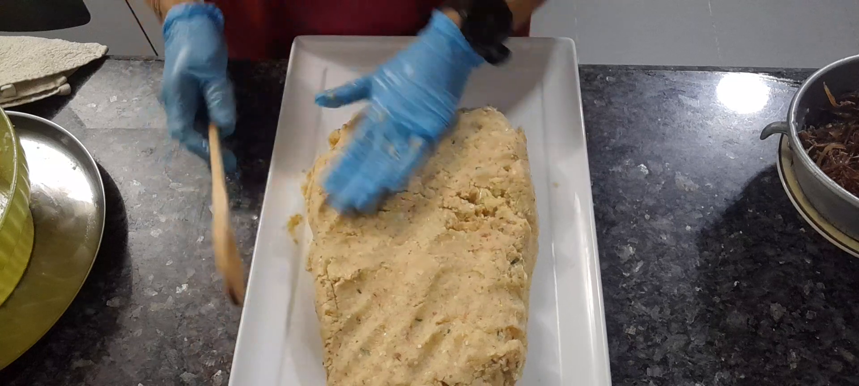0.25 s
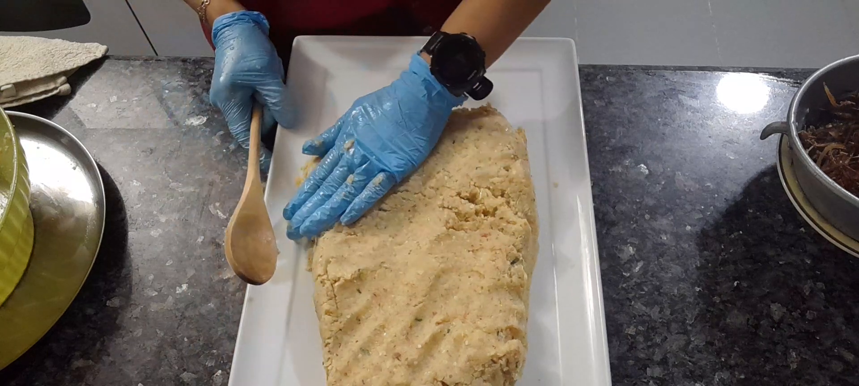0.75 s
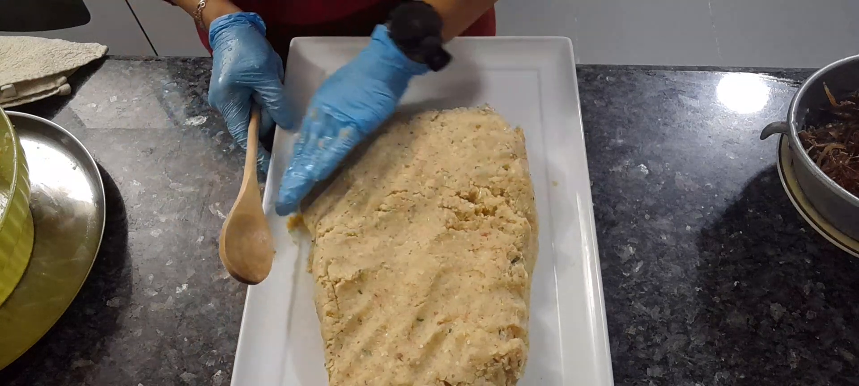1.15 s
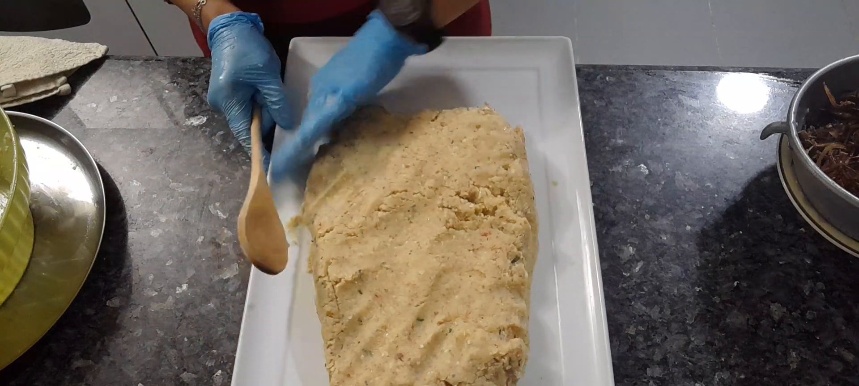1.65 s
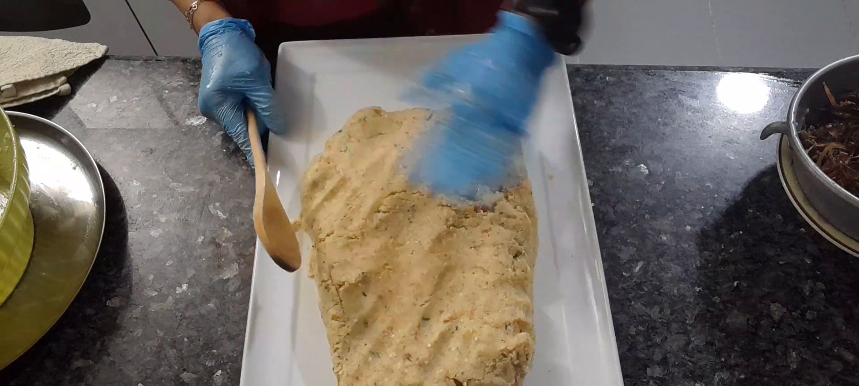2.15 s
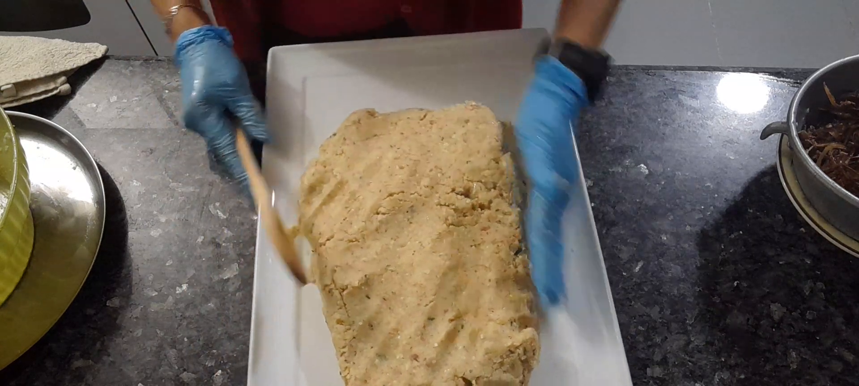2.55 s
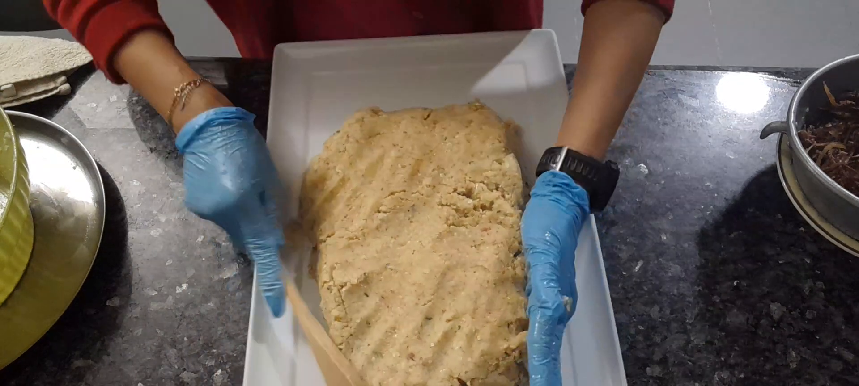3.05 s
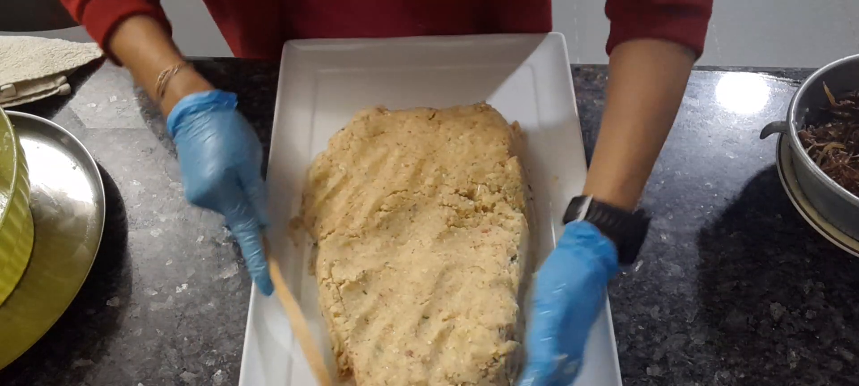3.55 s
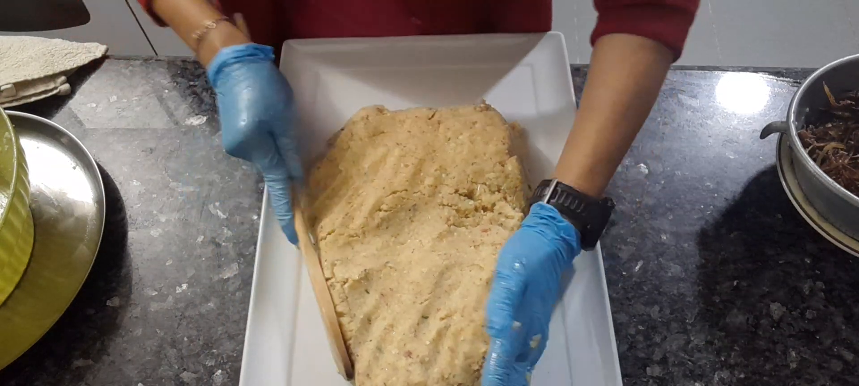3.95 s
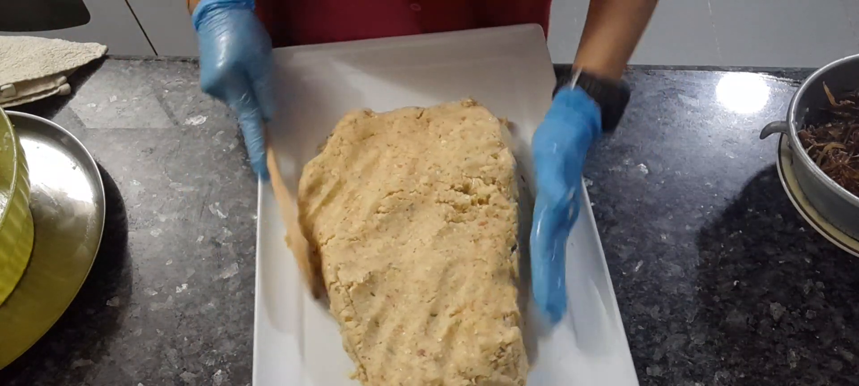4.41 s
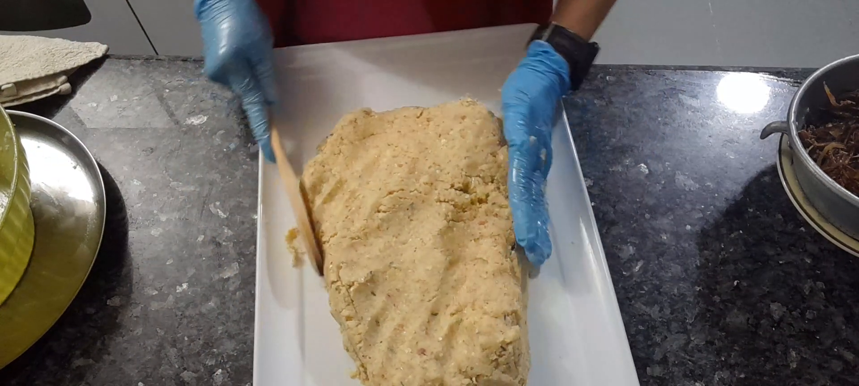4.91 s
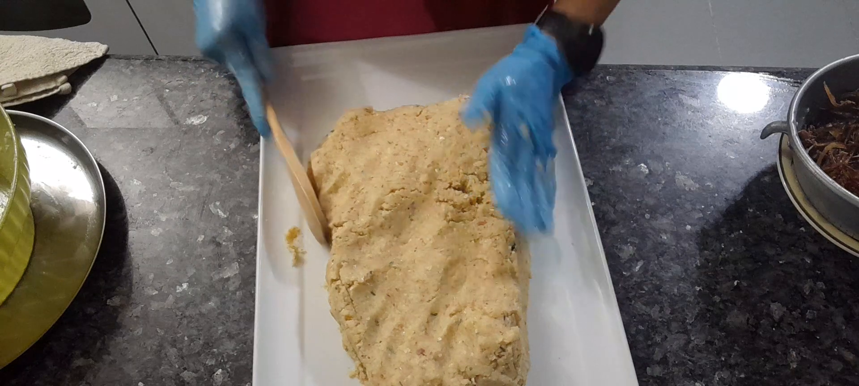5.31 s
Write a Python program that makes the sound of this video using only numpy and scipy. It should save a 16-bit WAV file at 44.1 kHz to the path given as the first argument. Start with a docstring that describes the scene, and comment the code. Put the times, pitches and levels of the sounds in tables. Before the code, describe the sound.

In a small, quiet kitchen, a quick cluster of dull platter knocks and wooden spatula taps opens the scene. Then mostly soft glove swishes and faint sticky crackles, until pushes rock the dish again in irregular bursts from the middle to the end. A tiny squeak and faint metallic bracelet ticks come late. Close stereo microphone, short room echo, low steady background hum.

```python
'''A quick run of dull knocks opens the scene: hands and a spatula press mash into shape on a platter.
Each push rocks the ceramic platter against the counter; under a flat palm it chatters briefly.
The wooden spatula taps the dish. Thin gloves swish, crackle, click and squeak, and a bracelet ticks faintly.
Blows are decaying sine waves and short noise bursts; the gloves are mostly shaped noise.
A small kitchen adds its bass, its echo and a quiet background.'''
import sys
import numpy as np
from scipy import signal
from scipy.fft import rfft, irfft, next_fast_len
from scipy.io import wavfile

SR = 44100
rng = np.random.default_rng(int(sys.argv[2]) if len(sys.argv) > 2 else 0)


def bounce(signal):
    """Save signal as a 16-bit WAV file at the path given by the first command-line argument."""
    frames = np.transpose(np.atleast_2d(signal))
    limited = np.clip(frames, -1, 1)
    pcm = np.round(limited * 32767).astype(np.int16)
    wavfile.write(sys.argv[1], SR, pcm)


N = 245621
AGE = np.arange(int(SR * .7)) / SR  # time since a blow, in seconds
OPPOSITE = np.array([[1], [-1]])  # left and right move in opposite directions


def from_db(db):
    """Turn decibels into a gain."""
    return 10 ** (np.asarray(db) / 20)


def at_hz(points, hz):
    """Read a table between its points on a log-frequency axis."""
    points_hz, values = np.array(points).T
    return np.interp(np.log(hz + 1), np.log(points_hz), values)


def fade(t60):
    """Exponential decay: the sound falls by 60 dB in t60 seconds."""
    return from_db(-60 * AGE / max(t60, 1e-3))


def onset(rise_s):
    """A contact takes a moment to build up."""
    return 1 - np.exp(-(AGE / rise_s) ** 2)


def add(out, s, sound):
    """Mix a sound in at time s, in seconds."""
    i = max(round(s * SR), 0)
    out[:, i:i + sound.shape[-1]] += sound[..., :max(N - i, 0)]


def noise(spectrum, side_db, size):
    """Coloured stereo noise of rms 1; side_db sets how much the two ears differ."""
    length = next_fast_len(size)
    colour = from_db(at_hz(spectrum, np.fft.rfftfreq(length, 1 / SR)))
    white = rng.standard_normal((2, length))
    mid, side = irfft(rfft(white) * colour, length)[:, :size]
    both = mid + from_db(side_db) * side * OPPOSITE
    return both / both.std()


# each blow lands elsewhere and wakes the modes unevenly (dB)
SCATTER_DB = 2


def ring(modes, soft_hz, spread):
    """One blow on a set of modes: a soft contact spares the high ones, whose phase differs between the ears."""
    out = 0
    for k, (hz, db, t60) in enumerate(modes):
        softness = np.hypot(1, (hz / soft_hz) ** 3)
        gain = from_db(db + SCATTER_DB * rng.standard_normal()) / softness
        # short waves reach the two ears out of step
        skew = spread * hz / (hz + 500) * rng.choice([-1, 1]) * rng.uniform(0.21, 1) * OPPOSITE
        wave = np.sin((2 * np.pi * hz * AGE + skew).astype(np.float32))
        out = out + (-1) ** k * gain * fade(t60) * wave
    return out * onset(1 / soft_hz)


def slipping(per_s):
    """Random grip and slip at a given rate."""
    return np.interp(np.arange(N) * per_s / SR, np.arange(N), rng.standard_normal(N))


# Tone of the still kitchen. Each row: frequency in Hz, relative strength in dB per Hz.
QUIET_SPECTRUM = [(15, -67), (25, -32), (102, -12.5), (114, -9), (134, 1.5), (153, -12), (326, -16.5),
                  (384, -26.5), (451, -22.5), (775, -38.5), (3520, -52.5), (4140, -46), (4740, -52.5),
                  (7510, -44.5), (16000, -67.5)]


def quiet_kitchen(level_db):
    """The still kitchen is a steady, mostly low noise."""
    return from_db(level_db) * noise(QUIET_SPECTRUM, side_db=-11, size=N)


# How long the kitchen echoes. Each row: frequency in Hz, time to fall by 60 dB in seconds.
ECHO_DECAY = [(150, 0.4), (500, 0.32), (1500, 0.43), (3000, 0.42), (6000, 0.37), (14000, .2)]
# Colour of the echo. Each row: frequency in Hz, relative level in dB.
ECHO_COLOUR = [(60, 9), (180, -6.5), (400, 0), (1000, -8), (3000, -10.5), (6000, -10.5), (14000, -8)]


def kitchen_echo(x, build_s):
    """A diffuse tail, dying band by band, alike in both ears in the bass."""
    white = rng.standard_normal((2, 2, len(AGE)))
    tail = 0
    edges = np.geomspace(60, 16000, 13)
    for k, (low, high) in enumerate(zip(edges, edges[1:])):
        hz = np.sqrt(low * high)
        band = signal.butter(2, [low, high], "band", fs=SR, output="sos")
        mid, side = signal.sosfilt(band, white[k % 2])
        both = mid + side * hz / np.hypot(hz, 600) * OPPOSITE
        tail = tail + both * from_db(at_hz(ECHO_COLOUR, hz)) * fade(at_hz(ECHO_DECAY, hz))
    tail = tail * onset(build_s)
    return signal.fftconvolve(x, tail / np.sqrt(SR * 0.013), axes=1)[:, :N]


# Low resonances of counter and room.
# Each row: frequency in Hz, relative level in dB, time to fall by 60 dB in seconds.
BOOM_MODES = [(54, -17, 0.55), (81.25, -5, 0.75), (106.04, -0.5, 0.6), (139.1, 5.5, 0.36), (160, -9, 0.036),
              (169, 5, 0.4), (202.8, 11.5, 0.39), (221.6, -4, 0.27), (270, -4, 0.15), (310.5, -13, 0.83),
              (304, -2.5, 0.099)]
# A palm comes down on the mash; contacts() below plays these too.
# Each row: start in seconds, relative weight in dB, length of the press in seconds.
PALM_PRESSES = [(0.074, -20, 0.092), (0.439, -53.5, 0.021), (0.622, -29, 0.033), (1.035, -59, 0.029),
                (1.927, -26, .046), (4.839, -39, 0.018), (5.332, -48, .07), (5.524, -19.5, 0.029)]


def boom(hits, knock_db, pat_db, delay_s):
    """Standing waves keep the bass going; a slow palm wakes mainly the deepest of them."""
    out = np.zeros((2, N))
    for s, db, _, _, _ in hits:
        swing = ring(BOOM_MODES, soft_hz=500, spread=0.75) * onset(0.00083)
        add(out, s + delay_s, from_db(db + knock_db) * swing)
    for s, db, _ in PALM_PRESSES:
        add(out, s, from_db(db + pat_db) * ring(BOOM_MODES, soft_hz=112, spread=1.0))
    return out


# Touches of the bracelet links. Each row: start in seconds, relative level in dB.
BRACELET_TICKS = [(2.8526, -51), (3.1277, -52.5), (3.234, -57), (3.7536, -50), (4.0206, -52),
                  (4.365, -48.5), (4.58, -57.5), (4.853, -58.5)]
# Notes of the bracelet.
# Each row: frequency in Hz, relative level in dB, time to fall by 60 dB in seconds.
BRACELET_MODES = [(7200, -6, 0.013), (7350, 3.5, 0.047), (13100, 6.5, 0.077), (13260, -7.5, .06),
                  (13270, -17, 0.069)]


def bracelet(tick_db):
    """Small metal links touch as the wrist turns: short, very high notes."""
    out = np.zeros((2, N))
    for s, db in BRACELET_TICKS:
        add(out, s, from_db(db + tick_db) * ring(BRACELET_MODES, soft_hz=18000, spread=2.4))
    return out


# Rubber squeaking on the glaze. Each row: start in seconds, relative level in dB.
SQUEAK_EVENTS = [(2.836, -58.5), (3.715, -54.5), (4.359, -39)]
# Pitch of a squeak, a narrow band. Each row: frequency in Hz, relative strength in dB per Hz.
SQUEAK_SPECTRUM = [(5600, -43), (6500, -7), (6750, 2), (7000, -23), (8000, -44)]


def squeaks(squeak_db, rise_s, t60):
    """Wet rubber sticks and slips fast enough to chirp."""
    out = np.zeros((2, N))
    for s, db in SQUEAK_EVENTS:
        chirp = noise(SQUEAK_SPECTRUM, side_db=0, size=len(AGE)) * onset(rise_s) * fade(t60)
        add(out, s, from_db(db + squeak_db) * chirp)
    return out


# How strongly damp mash and rubber crackle under the hands; gloves() below plays this too.
# Each row: time in seconds, relative level in dB.
CRACKLE_LEVEL = [(0.0, -78), (0.14, -79), (0.32, -86), (0.57, -85.5), (0.77, -78), (1.1, -91),
                 (1.41, -83.5), (1.61, -86.5), (1.88, -79.5), (2.3, -87.5), (2.54, -78), (2.69, -79.5),
                 (2.94, -77.5), (4.33, -74), (4.48, -73.5), (4.92, -79.5), (5.18, -83.5), (5.55, -75.5)]
# Tone of the gloves, also in gloves(). Each row: frequency in Hz, relative strength in dB per Hz.
GLOVE_SPECTRUM = [(300, -18.5), (900, -10.5), (1600, -12.5), (3000, -2), (4500, -3.5), (7600, 2.5),
                  (9000, -10), (13000, -4), (16000, -8.5)]
# average rate (per s), least level against the crackle table (dB), spread of sizes (dB)
STICKY_PER_S, STICKY_DB, STICKY_SPREAD_DB = 8.8, 21, 2


def sticky_clicks():
    """Specks of damp mash let go of the rubber one by one, louder the more the hands work."""
    work_db = np.interp(np.arange(N) / SR, *np.transpose(CRACKLE_LEVEL))
    born = rng.random(N) < STICKY_PER_S / SR
    extra_db = STICKY_SPREAD_DB * np.minimum(rng.exponential(1, N), 3)
    sizes = from_db(work_db + STICKY_DB + extra_db)
    click = noise(GLOVE_SPECTRUM, side_db=-0.5, size=len(AGE)) * fade(0.006)
    click = click / np.sqrt(np.sum(click ** 2))
    return signal.fftconvolve((born * sizes)[None], click, axes=1)[:, :N]


# Glove strokes over the mash. Each row: fastest moment in seconds, relative level in dB,
# basic half length in seconds, tilt in dB per octave.
GLOVE_STROKES = [(0.261, -55, 0.034, -5), (0.628, -71, 0.065, -3), (.932, -58.5, 0.025, -3),
                 (1.656, -65.5, 0.022, 0), (1.991, -60.5, 0.049, -7), (2.539, -56.5, 0.037, -7.5),
                 (2.847, -57.5, .014, -0.5), (3.09, -60.5, .018, -8.5), (3.446, -56, 0.031, -1.5),
                 (3.814, -60.5, 0.033, -3.5), (4.078, -56.5, 0.022, 0), (4.369, -56, 0.024, -3),
                 (4.635, -60, 0.043, -4), (5.075, -69, 0.023, 0), (5.319, -54.5, 0.024, -2.5)]
# A glove snaps free. Each row: start in seconds, relative level in dB.
GLOVE_SNAPS = [(0.052, -48), (1.431, -57), (1.6213, -54.5), (1.8764, -49), (2.901, -50), (3.118, -52),
               (3.1922, -53.5), (3.3697, -52.5), (4.0177, -42)]
# the hand gathers speed more slowly than it stops: rise and fall as shares of the half length
STROKE_RISE, STROKE_FALL = 1.1, 0.73


def gloves(stroke_db, rub_db, grain_db, crackle_db, snap_db):
    """Thin rubber slides in tiny slips, crackles on the damp mash and now and then snaps free."""
    clock = np.arange(N) / SR
    slips, clumps = slipping(430), slipping(100)
    work_db = np.interp(clock, *np.transpose(CRACKLE_LEVEL))
    crackle = work_db + rub_db + crackle_db * (slips + clumps)
    # the crackle is brighter than the plain glove tone
    bright = [(hz, db + 1.9 * np.log2(hz)) for hz, db in GLOVE_SPECTRUM]
    out = from_db(crackle) * noise(bright, side_db=1, size=N)

    for s, db, length, tilt in GLOVE_STROKES:
        # friction follows the speed of the hand
        near = np.abs(clock - s) < .25
        lag = clock[near] - s
        share = np.where(lag < 0, STROKE_RISE, STROKE_FALL)
        speed = np.exp(-.5 * (lag / length / share) ** 2)
        # a flat palm sounds duller than the fingertips
        colour = [(hz, level + tilt * np.log2(hz)) for hz, level in GLOVE_SPECTRUM]
        gain = from_db(db + stroke_db + grain_db * slips[near])
        out[:, near] += gain * speed * noise(colour, side_db=0, size=len(lag))

    snap_shape = onset(0.00046) * (fade(0.01) + 0.25 * fade(0.06))
    for s, db in GLOVE_SNAPS:
        snap = noise(GLOVE_SPECTRUM, side_db=-2.0, size=len(AGE)) * snap_shape
        add(out, s, from_db(db + snap_db) * snap)
    return out


# Spatula on the platter. Each row: start in seconds, then relative levels in dB
# of the dish, the wood and the glaze ring.
SPATULA_TAPS = [(.076, -31, -26, -55.5), (.116, -35.5, -27, -64), (1.799, -62.5, -90, -98),
                (2.684, -27.5, -30, -38.5), (4.437, -50, -50.5, -80), (4.501, -30, -43, -62),
                (4.772, -26, -12.5, -47)]
# Notes of the platter, mostly short, the lowest ringing longest; clacks() below rings them too.
# Each row: frequency in Hz, relative level in dB, basic time to fall by 60 dB in seconds.
PLATTER_MODES = [(315.8, -2.5, 0.38), (349.6, -1.5, 0.19), (428, -4, 0.17), (474.2, 2, 0.064),
                 (575, 0, 0.087), (631.5, -2.5, 0.17), (702, -4, 0.11), (810, -7, 0.032),
                 (870, -3.5, 0.097), (977, -10.5, 0.037), (1925, -13, 0.14), (2780, -4, 0.26),
                 (2840, -7, 0.14), (3730, -10.5, 0.18), (5626, -15, 0.19), (6110, -13, 0.11),
                 (7620, -18, 0.15), (8600, -23, .12), (13520, -23.5, .15)]
# Notes of the wooden spatula.
# Each row: frequency in Hz, relative level in dB, time to fall by 60 dB in seconds.
SPATULA_MODES = [(1185, -4.5, 0.033), (1270, -10.5, 0.13), (1450, -12.5, 0.11), (1660, -4, 0.023),
                 (1744, 1, 0.02), (1932, 3.5, 0.02), (2050, -3.5, 0.016), (2047, -6, 0.027),
                 (2200, -7, 0.039), (2400, -1.5, 0.019), (2527, -5, 0.052), (2712, 1.5, 0.044),
                 (2940, -18, 0.017), (3535, -12, .06)]
# Tone of the platter's clack, also in clacks(), and of the spatula's rattle.
# Each row: frequency in Hz, relative strength in dB per Hz.
CLACK_SPECTRUM = [(200, -8), (350, 5), (900, 6), (1300, 1), (2000, -1), (2900, -4.5), (3600, -16.5),
                  (4500, -23), (7500, -35), (10000, -53.5), (16000, -48)]
# Tone of the spatula's crack. Each row: frequency in Hz, relative strength in dB per Hz.
CRACK_SPECTRUM = [(300, -15.5), (1200, -4), (3000, 1.5), (4000, -6.5), (5500, 0), (7800, -4), (9200, -17.5),
                  (13000, -18), (16000, -30)]
# the crack grows much faster than the blow: dB per dB of dish
CRACK_GROWTH = 4.8


def spatula(dish_db, wood_db, glaze_db, crack_db, rattle_db):
    """Wood on ceramic: a crack, a rattle, the short note of the spatula and the ring of the dish."""
    out = np.zeros((2, N))
    high_pass = signal.butter(2, 2000, "high", fs=SR, output="sos")
    lean_left = from_db([[2.5], [-2.5]])
    hardest = max(dish for _, dish, _, _ in SPATULA_TAPS)
    for s, dish, wood, glaze in SPATULA_TAPS:
        add(out, s, from_db(dish + dish_db) * ring(PLATTER_MODES, soft_hz=1420, spread=0.58))
        wood_note = ring(SPATULA_MODES, soft_hz=3900, spread=0.89) * lean_left
        add(out, s, from_db(wood + wood_db) * wood_note)
        rattle = noise(CLACK_SPECTRUM, side_db=-6.5, size=len(AGE)) * onset(.001) * fade(0.16)
        add(out, s, from_db(wood + rattle_db) * rattle)
        # the hard edge of the blow wakes the high modes
        glaze_ring = signal.sosfilt(high_pass, ring(PLATTER_MODES, soft_hz=15000, spread=1.2))
        add(out, s, from_db(glaze + glaze_db) * glaze_ring)
        crack = noise(CRACK_SPECTRUM, side_db=3.5, size=len(AGE)) * onset(.0006) * fade(0.039)
        add(out, s, from_db(crack_db + CRACK_GROWTH * (dish - hardest)) * crack)
    return out


# Tone of the jolted mash. Each row: frequency in Hz, relative strength in dB per Hz.
SQUASH_SPECTRUM = [(30, -42), (100, -9), (250, 0), (350, 7.5), (480, -10.5), (700, -7.5), (1000, -25.5),
                   (1500, -26), (3000, -49), (16000, -77.5)]


def clacks(hits, dish_db, squash_db, clack_db, edge_db, squash_t60, clack_t60, hard_db, dulling, knee_hz):
    """The foot of the platter meets the stone: a dull ring, the jolt of the mash and a short clack."""
    out = np.zeros((2, N))
    squash_shape = onset(0.00074) * fade(squash_t60)
    clack_shape = onset(0.0012) * (fade(clack_t60) + from_db(edge_db) * fade(0.0059))
    for s, _, _, dish, clack in hits:
        dull_ring = ring(PLATTER_MODES, soft_hz=1000, spread=0.63) * fade(0.96)
        add(out, s, from_db(dish + dish_db) * dull_ring)
        squash = noise(SQUASH_SPECTRUM, side_db=-10, size=len(AGE)) * squash_shape
        add(out, s, from_db(dish + squash_db) * squash)
        # a gentler contact loses its top: dB per octave above the knee
        slope = dulling * np.clip(hard_db - clack, 0, 20)
        colour = [(hz, db - slope * max(np.log2(hz / knee_hz), 0)) for hz, db in CLACK_SPECTRUM]
        burst = noise(colour, side_db=-2.0, size=len(AGE)) * clack_shape
        add(out, s, from_db(clack + clack_db) * burst)
    return out


def thuds(hits, swell_s, sharpness, thud_db):
    """The loaded platter sets the counter swinging: a few cycles swell and die."""
    out = np.zeros((2, N))
    swell = (AGE / swell_s * np.exp(1 - AGE / swell_s)) ** sharpness
    for s, db, hz, _, _ in hits:
        add(out, s, from_db(db + thud_db) * swell * np.sin(2 * np.pi * hz * AGE))
    return out


# Pushes that rock the platter onto the counter. Each row: start in seconds,
# relative thud level in dB, thud pitch in Hz, relative level of the foot's clack in dB.
PLATTER_KNOCKS = [(0.0, -26, 207, -41.5), (0.024, -21.5, 186.3, -39), (0.071, -12.5, 205.3, -24.5),
                  (0.099, -14, 206, -30), (0.113, -16.5, 179, -27), (0.303, -32.5, 191, -74),
                  (0.606, -29.5, 186, -46.5), (1.877, -45, 195, -56), (1.919, -30.5, 171, -46),
                  (2.551, -38.5, 161, -65.5), (2.64, -19.5, 184, -36.5), (2.733, -15.5, 179.5, -38),
                  (2.828, -26.5, 155, -51), (2.854, -24.5, 153, -66.5), (3.413, -38, 158, -70),
                  (3.512, -24, 189, -34.5), (3.56, -14.5, 173.7, -36), (3.69, -30, 184, -61),
                  (3.765, -31, 141, -82), (3.83, -32, 183, -75), (4.04, -36.5, 176.5, -69),
                  (4.111, -38, 166, -58.5), (4.187, -14, 173, -35.5), (4.438, -19, 186.5, -51.5),
                  (4.587, -14.5, 172.2, -36), (4.713, -27, 165, -68), (4.838, -20, 173, -61),
                  (4.952, -30, 152.4, -50), (4.97, -22.5, 183, -83), (5.279, -41.5, 181, -80),
                  (5.326, -18, 191, -32), (5.376, -21.5, 180, -34), (5.522, -16, 191, -35)]
# the dish rings with the weight and the hardness of a knock: dB per dB of thud, dB per dB of clack
DISH_PER_THUD, DISH_PER_CLACK = 0.73, 0.18
# chatter under the palm: pitch (Hz), thud and clack against the palm's weight (dB), unevenness (s)
CHATTER_HZ, CHATTER_THUD_DB, CHATTER_CLACK_DB, CHATTER_JITTER_S = 210.6, -3, -23.5, .001


def contacts(count):
    """Every push, and quick touches under each palm: rows of (s, thud dB, pitch Hz, dish dB, clack dB)."""
    rows = list(PLATTER_KNOCKS)
    jitter = CHATTER_JITTER_S * rng.standard_normal((len(PALM_PRESSES), count))
    for (s, db, length), late in zip(PALM_PRESSES, jitter):
        touches = s + length * np.arange(1, count + 1) / count + late
        for touch in touches:
            rows.append((touch, db + CHATTER_THUD_DB, CHATTER_HZ, db + CHATTER_CLACK_DB))
    return [(s, thud, hz, DISH_PER_THUD * thud + DISH_PER_CLACK * clack, clack)
            for s, thud, hz, clack in rows]


def scene():
    """All sounds at the counter, the room and its quiet background."""
    quiet = quiet_kitchen(level_db=-60)

    hands = gloves(stroke_db=3.0, rub_db=7.5, grain_db=3.5, crackle_db=2.5, snap_db=0)
    hands = hands + bracelet(tick_db=-4) + sticky_clicks()
    hands = hands + squeaks(squeak_db=4, rise_s=0.0053, t60=0.037)

    hits = contacts(count=3)
    taps = spatula(dish_db=2.5, wood_db=-1, glaze_db=6, crack_db=-23, rattle_db=-9.0)
    knocks = clacks(hits, dish_db=-19, squash_db=-7.5, clack_db=5.5, edge_db=-2.0, squash_t60=0.13,
                    clack_t60=0.094, hard_db=-31.5, dulling=0.77, knee_hz=1600)
    low = thuds(hits, swell_s=0.01, sharpness=3.44, thud_db=4.5)
    blows = low + knocks + taps

    echo = from_db(-4.5) * kitchen_echo(blows + from_db(0.5) * hands, build_s=0.0047)
    room = echo + boom(hits, knock_db=-20.0, pat_db=-6.5, delay_s=.016)
    return blows + hands + room + quiet


CUTOFF_HZ = 15900


def record(dry):
    """A steep low-pass filter cuts the top of the spectrum."""
    low_pass = signal.ellip(10, .1, 80, CUTOFF_HZ, fs=SR, output="sos")
    return signal.sosfilt(low_pass, dry)


dry = scene()
out = record(dry)
bounce(out)
```